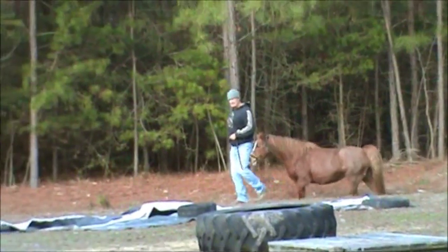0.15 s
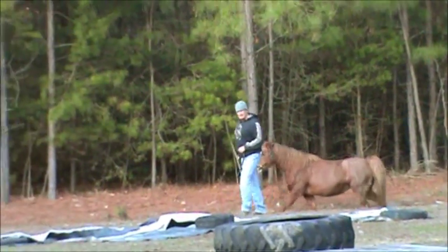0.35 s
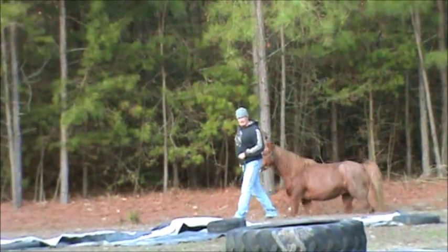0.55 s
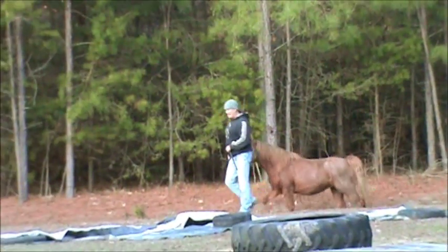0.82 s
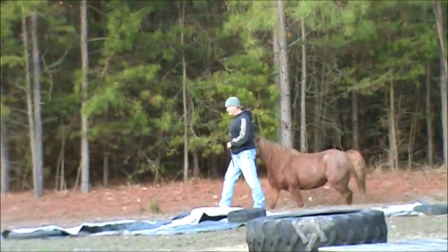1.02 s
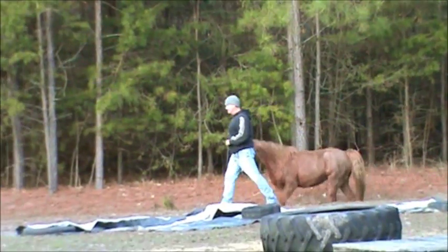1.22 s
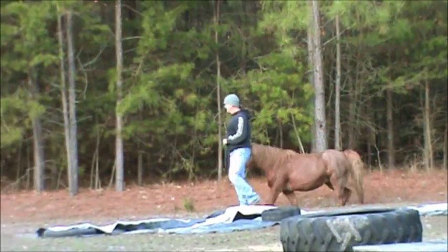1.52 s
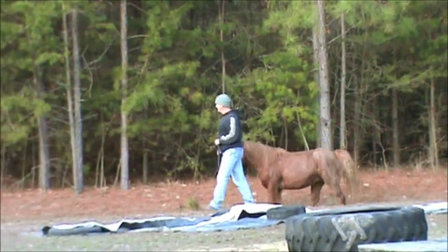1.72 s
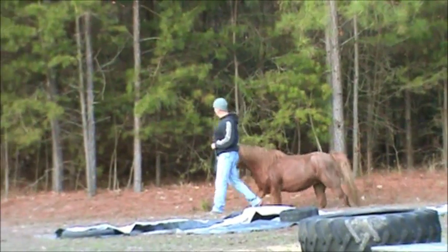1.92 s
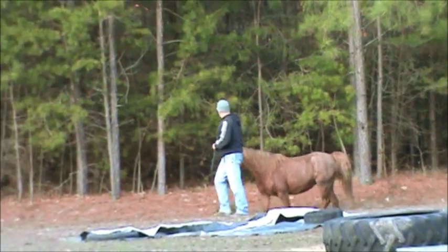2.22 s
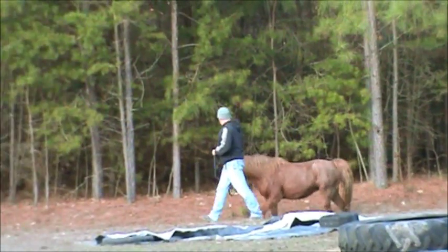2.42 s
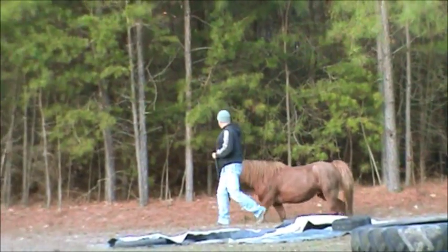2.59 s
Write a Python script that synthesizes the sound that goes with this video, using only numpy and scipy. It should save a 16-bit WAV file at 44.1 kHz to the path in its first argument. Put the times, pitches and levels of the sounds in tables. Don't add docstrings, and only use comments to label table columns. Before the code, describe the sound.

One loud horse whinny slightly left of a stereo microphone in an open yard by woods: shrill fluttering squeal, breathy falling tail with pulsing grunts, short snort, then a tiny bird chip over quiet distant rumble and hiss.

```python
import sys
import numpy as np
from scipy import signal
from scipy.fft import rfft, irfft
from scipy.io import wavfile
from scipy.ndimage import uniform_filter1d

SR = 44100
rng = np.random.default_rng(int(sys.argv[2]) if len(sys.argv) > 2 else 0)


def volts_from_decibels(level):
    exponent = np.asarray(level, float) / 20
    return 10 ** exponent


def int16_out(signal):
    q = np.round(np.clip(np.atleast_2d(signal).T, -1, 1) * 32767)
    wavfile.write(sys.argv[1], SR, q.astype(np.int16))


N = 121275
T = np.arange(N) / SR


def evened(x):
    return x / np.sqrt(np.mean(x ** 2) + 1e-20)


def read(points, hz):
    f, value = np.transpose(points)
    return np.interp(np.log(hz + 1), np.log(f + 1), value)


def curves(table):
    rows = np.transpose(table)
    return [np.interp(T, rows[0], column) for column in rows[1:]]


def bump(s, half):
    return np.exp(-.5 * ((T - s) / half) ** 2)


def drift(s):
    hz = np.fft.rfftfreq(N, 1 / SR)
    return evened(irfft(rfft(rng.standard_normal(N)) * np.exp(-(hz * s * np.pi) ** 2), N))


def resonate(x, hz, width):
    r = np.exp(-np.pi * width / SR)
    turn = np.exp(2j * np.pi * np.cumsum(hz * np.ones(N)) / SR)
    smooth = signal.lfilter([(1 - r) ** 2], [1, -2 * r, r * r], x * turn.conj())
    return 2 * (turn * smooth).real


def noise_band(hz, width):
    return evened(resonate(rng.standard_normal(N), hz, width))


def panned(x, pan_db):
    return np.array([x * volts_from_decibels(pan_db / 2), x * volts_from_decibels(-pan_db / 2)])


# (f/Hz, level/dB per Hz)
AIR_SPECTRUM = [(20, -16), (93, -7), (160, -13.5), (250, -19), (1020, -25.5), (1510, -30.5), (1890, -24.5),
                (6460, -40.5), (15800, -43)]
# (f/Hz, likeness 0-1)
AIR_LIKENESS = [(60, .9999), (150, .995), (300, .85), (700, .93), (1500, .5), (4000, .55), (9000, .65),
                (15000, .86)]


def air():
    frames, hz = N // 256 + 5, np.fft.rfftfreq(1024, 1 / SR)
    a, b, c, d, patches = rng.standard_normal((frames, 513, 5)).T
    patches = uniform_filter1d(patches, size=8, axis=0)
    patches = evened(uniform_filter1d(patches, size=14, axis=1))
    same = np.clip(read(AIR_LIKENESS, hz), -1, 1)[:, None]
    left = a + 1j * b
    right = same * left + np.sqrt(1 - same ** 2) * (c + 1j * d)
    patch_db = (-0.8 + 1.5 * (hz < 200)[:, None]) * patches
    z = np.array([left, right]) * volts_from_decibels(read(AIR_SPECTRUM, hz)[:, None] + patch_db)
    return volts_from_decibels(-44.5) * evened(signal.istft(z, nperseg=1024, noverlap=768)[1][:, :N])


# (f/Hz, width/Hz, level/dB)
FAR_ENGINE = (67.9, 6.8, -57.5)


def drone():
    hz, width, db = FAR_ENGINE
    return volts_from_decibels(db) * noise_band(hz, width)


# (t/s, f/Hz, level/dB, wander/Hz, upper sideband level/dB)
SQUEAL_PATH = [(.05, 1873, -50, 3.9, -12), (.12, 1873, -44, 7, 18.5), (.2, 1925, -29, 4.7, 14.5),
               (.3, 1883, -20, 5.4, 9), (.45, 1896, -23, 10.147, 2), (.75, 1896, -21, 12.73, 0.5),
               (.88, 1916, -20, 23.2, 5), (1.0, 1886, -19.5, 10.8, -7), (1.3, 1857, -21.5, 84.8, -7),
               (1.55, 1790, -27, 201.4, -7.5), (1.8, 1707, -28, 295, 0), (1.97, 1565, -28.5, 341.2, -8),
               (2.08, 1450, -31, 326, -5.5), (2.2, 1267, -29, 187.3, -5), (2.31, 1297, -31, 230, -8),
               (2.41, 1376, -28, 280, 2), (2.5, 1345, -37, 280, -10), (2.7, 1330, -40, 230, -5)]
# (t/s, dip level/dB, half length/s)
TRILL_DIPS = [(0.211, -14.5, 0.015), (0.28, -11, 0.016), (0.298, -5, .003), (0.352, -7.5, 0.011),
              (0.368, -10, .003), (0.401, -14, 0.001647), (0.438, -24.5, 0.0053), (0.475, -28, 0.0029),
              (.511, -18, 0.0054), (0.545, -27, 0.0089), (0.571, -12, .0025), (0.611, -13.5, 0.0042),
              (0.634, -6, 0.0085), (0.652, -15, 0.0032), (0.706, -24, 0.0035), (.718, -17, 0.0025),
              (0.734, -26, 0.0052), (0.756, -23, 0.0014), (0.773, -20, 0.0012), (.793, -30, 0.0045),
              (.832, -16.5, 0.002), (.847, -6, 0.002048), (.882, -14, 0.0016), (0.903, -8.5, 0.0033),
              (.916, -13, 0.0034), (0.93, -10.5, 0.011), (0.947, -20, .004), (.961, -19, .002),
              (0.988, -8, 0.0019), (1.002, -10, 0.00095), (1.021, -2, 0.0032), (1.05, -10, 0.0017),
              (1.07, -14, .006), (1.09, -19, 0.0026), (1.134, -19, 0.006618), (1.165, 1, 0.0038),
              (1.206, 1, 0.005), (1.214, -7, 0.019), (1.247, -31, 0.004), (1.282, -22, 0.0031),
              (1.317, -9, 0.004), (1.338, -9, 0.0038), (1.376, -9, 0.005), (1.41, 1, 0.0021),
              (1.429, -8, 0.0018), (1.45, -12, 0.00433)]
# (f/Hz, width/Hz, level/dB)
MOUTH_RESONANCES = [(1222, 100, -1), (1385, 150, -5), (1680, 240, -4), (1900, 80, 0), (2050, 220, -7),
                    (2230, 150, -7)]
OVERTONE_LEVELS = [-42, -42, -41]


def squeal():
    hz, db, wander_hz, side_db = curves(SQUEAL_PATH)
    wander = np.tanh(drift(.003) + 0.406 * drift(0.01106))
    phase = 2 * np.pi * np.cumsum(hz + wander_hz * wander) / SR
    slow = 2 * np.pi * np.cumsum(108 + 9.27 * drift(0.0172)) / SR
    chop = volts_from_decibels(sum(dip_db * bump(s, half) for s, dip_db, half in TRILL_DIPS))
    sounding = (T > SQUEAL_PATH[0][0]) * (T < SQUEAL_PATH[-1][0])
    level = volts_from_decibels(db + .8 * drift(.004)) * sounding
    sideband = volts_from_decibels(side_db + 1.8 * drift(0.0024)) * np.sin(phase + slow)
    tone = level * (np.sin(phase) + sideband)
    overtones = sum(volts_from_decibels(o_db) * np.sin(k * (phase + slow)) for k, o_db in enumerate(OVERTONE_LEVELS, 2))
    mouth = sum(volts_from_decibels(m_db) * resonate(tone, f, w) for f, w, m_db in MOUTH_RESONANCES)
    return chop * (level * bump(0.2, .045) * overtones + volts_from_decibels(3.5) * mouth)


# (f/Hz, time to fall 60 dB/s)
WOODS_DECAY = [(300, 1), (1200, 0.72), (2000, 1.0), (4000, 0.84), (8000, 0.4672)]


def woods(x, alike):
    taps = np.zeros((2, SR))
    at = np.arange(400, SR - 20, 20)
    at = at + rng.integers(0, 20, (2, len(at)))
    np.put_along_axis(taps, at, rng.choice([-1., 1.], at.shape), 1)
    taps = np.array([taps[0], alike * taps[0] + np.sqrt(1 - alike ** 2) * taps[1]])
    hz, t, z = signal.stft(taps, SR, nperseg=256)
    decay = volts_from_decibels(-60 * t / read(WOODS_DECAY, hz)[:, None])
    tail = signal.istft(z * decay, SR, nperseg=256)[1]
    return signal.fftconvolve(x, tail / np.linalg.norm(tail[0]), axes=1)[:, :N]


# (t/s, level/dB, brightness/dB per octave)
BREATH_EFFORT = [
    (.1, -55, 3),
    (.25, -38, 0),
    (.45, -34, 0),
    (1.1, -29, 0),
    (1.7, -33, 0.5),
    (2.25, -33, -2),
    (2.33, -37, -4.5),
    (2.41, -34, -1),
    (2.53, -41.5, -4.5),
    (2.76, -47.5, -7),
]
# (f/Hz, width/Hz, level/dB, gain over the call/dB per s)
THROAT_RESONANCES = [(707, 209, -3, 0.36), (1262, 287, -0.5, 1.6), (1646, 310, -4, 1.2),
                     (1980, 304, 2.5, -2.5), (2203, 280, -2.5, -1.7), (2634, 197.55, -12.5, -3),
                     (2910, 314, -14.5, 3.85), (3330, 364, -10, 1.5), (3740, 400, -14.5, 0.9),
                     (4407, 704, -14.5, 0.45), (5320, 840, -21.5, -0.2), (6230, 2150, -28, -0.59),
                     (8600, 4400, -37, -1.66)]
# (t/s, treble lift level/dB, half length/s)
BREATH_THROBS = [(0.641, -1, 0.07), (0.753, 2, 0.034), (0.89, 2, 0.025), (1.04, 0.5, 0.022),
                 (1.166, 3, 0.01), (1.293, 2, 0.015), (1.43, 3, 0.027), (1.544, 4, 0.024),
                 (1.696, 5, 0.029), (1.838, 4.5, 0.047), (1.961, 4, 0.03384), (2.098, 6.5, 0.034),
                 (2.264, 9.5, 0.02), (2.399, 6, 0.026)]
# (t/s, factor on f)
JAW_OPENING = [
    (.3, 1.0458),
    (1.0, 1.035),
    (1.4, 1.02),
    (1.75, 1.004),
]


def breath():
    db, tilt_db = curves(BREATH_EFFORT)
    lift_db = sum(throb_db * bump(s, half) for s, throb_db, half in BREATH_THROBS)
    turbulence = rng.standard_normal(N) * volts_from_decibels(0.27 * drift(0.0021))
    jaw, = curves(JAW_OPENING)
    out = np.zeros(N)
    for k, (hz, width, f_db, slope_db) in enumerate(THROAT_RESONANCES):
        share = np.clip((hz - 1500) / 2000, .15, 1.3)
        patch_db = 2.53 * drift(0.015)
        level_db = f_db + slope_db * (T - 0.43) + share * lift_db + patch_db + tilt_db * np.log2(hz / 2000)
        moved = hz if 1000 < hz < 3100 else hz * jaw
        band = evened(resonate(turbulence, moved, width)) * np.sqrt(width)
        out += (-1) ** k * band * volts_from_decibels(level_db)
    return evened(out) * volts_from_decibels(db) * (T > BREATH_EFFORT[0][0]) * (T < BREATH_EFFORT[-1][0])


# (f/Hz, width/Hz, share removed 0-1)
NASAL_BRANCHES = [(901, 145.22, 0.74), (1383, 155.2, 0.56), (2385, 106.66, 0.24)]


def swallowed(x):
    hz = np.fft.rfftfreq(N, 1 / SR)
    valleys = [1 - share * np.exp(-.5 * ((hz - f) / w) ** 2) for f, w, share in NASAL_BRANCHES]
    return irfft(rfft(x) * np.prod(valleys, axis=0), N)


# (f/Hz, width/Hz, level/dB, half length/s)
PALATE_WHISTLES = [(4650, 300, -51, .14), (2700, 190, -49, .17), (3480, 280, -43, .1),
                   (3330, 160, -40, .03), (3320, 150, -39, .035), (3310, 150, -40, .025),
                   (3430, 150, -41, .014), (8300, 1500, -60, .025), (9000, 2500, -62, .025),
                   (4450, 400, -45, .06), (6900, 400, -57, .3)]
WHISTLE_TIMES = (.42, .45, 1.12, 1.71, 1.83, 1.96, 2.265, .64, 2.33, 1.44, 1.0)


def whistles():
    rows = zip(PALATE_WHISTLES, WHISTLE_TIMES)
    return sum(volts_from_decibels(db) * bump(s, half) * noise_band(hz, w) for (hz, w, db, half), s in rows)


# (t/s, level/dB, pulse f/Hz, half length/s)
GRUNT_PULSES = [(0.385, -53.5, 170, 0.0222), (0.877, -49.5, 169.7, 0.022), (1.15, -44, 171.2, 0.0107),
                (1.299, -49, 172.7, 0.016), (1.443, -44, 169.4, 0.027), (1.599, -42, 171.9, 0.03139),
                (1.756, -45.5, 164.3, 0.041), (1.875, -42.5, 162.5, 0.021), (2.032, -45.5, 147.6, 0.034424),
                (2.172, -42.5, 148.3, 0.031), (2.335, -44, 130, 0.022), (2.468, -47, 130, 0.027)]
# (f/Hz, width/Hz, level/dB)
CHEST_RESONANCES = [(130, 54, -13.5), (207, 96, 1), (345, 600, -2.5), (527.5, 61, 3.5)]


def grunts():
    times, _, pitch, _ = np.transpose(GRUNT_PULSES)
    turns = np.cumsum(np.interp(T, times, pitch) * (1 + 0.0598 * drift(0.00326))) / SR
    folds = sum(np.cos(2 * np.pi * k * turns) for k in range(1, 6))
    drive = .7 * evened(folds) + .3 * noise_band(260, 440)
    rings = [volts_from_decibels(db) * resonate(drive, hz, w) for hz, w, db in CHEST_RESONANCES]
    chest = evened(sum((-1) ** k * ring for k, ring in enumerate(rings)))
    thud = np.cos(2 * np.pi * turns)
    out = np.zeros(N)
    for s, db, hz, half in GRUNT_PULSES:
        thud_db = 0.56 * (142.5 - hz) - 5.5
        out += volts_from_decibels(db) * bump(s, half) * (chest + volts_from_decibels(thud_db) * thud)
    return out


# (t/s, half length/s, f/Hz, width/Hz, level/dB)
CHEST_HUM = (2.2, -0.07, 203, 45, -48)


def nicker():
    s, half, hz, width, db = CHEST_HUM
    return volts_from_decibels(db) * bump(s, half) * noise_band(hz, width)


# (f/Hz, width/Hz, level/dB, half length/s)
NOSTRIL_RESONANCES = [(4220, 860, -33.5, 0.019), (4387, 260, -46.5, 0.035), (6350, 1600, -49, 0.026),
                      (7030, 400, -53, 0.069), (9000, 2900, -52.5, 0.05), (12000, 3800, -59.5, .03)]
NOSTRIL_TIMES = (2.402, 2.465, 2.39, 2.46, 2.455, 2.46)


def snort():
    puff = rng.standard_normal(N) * volts_from_decibels(2.1 * drift(0.00079))
    rows = zip(NOSTRIL_RESONANCES, NOSTRIL_TIMES)
    nose = sum(volts_from_decibels(db) * bump(s, half) * evened(resonate(puff, hz, w)) for (hz, w, db, half), s in rows)
    return np.clip((2.51 - T) / 0.024, 0, 1) * nose


# (t/s, f/Hz, level/dB, half length/s, glide/Hz per s)
BIRD_NOTES = [
    (2.729, 4050, -41, 0.0026, -90000),
    (2.73, 3455, -38, 0.0039, -10000),
    (2.74, 6260, -56, 0.0045, -5000),
]


def bird():
    out = np.zeros(N)
    for s, hz, db, half, glide in BIRD_NOTES:
        t = T - s
        out += volts_from_decibels(db) * bump(s, half) * np.sin(2 * np.pi * (hz + glide * t / 2) * t)
    return out


def scene():
    high, low = squeal(), swallowed(breath())
    close = grunts() + snort() + whistles() + nicker()
    head_pan_db = 6 - 0.5 * np.minimum(T, 1.4)
    pony = panned(high, head_pan_db) + panned(low + close, .5)
    squeal_echo = volts_from_decibels(-11) * woods(panned(high, 1.5), 0.15)
    breath_echo = volts_from_decibels(-2.5) * woods(panned(low + volts_from_decibels(-11.0) * close, 0), 0.58)
    return pony + squeal_echo + breath_echo + bird() + air() + drone()


def roll_off(x):
    return signal.sosfilt(signal.butter(12, 15920, fs=SR, output="sos"), x)


def record(dry):
    whine = volts_from_decibels(-77.5) * np.sqrt(2) * np.sin(2 * np.pi * 15734 * T)
    band_limit = signal.firwin(2047, 15930, window=("kaiser", 9), fs=SR)
    mix = signal.oaconvolve(dry + whine, band_limit[None], "same")
    return roll_off(mix)


dry = scene()
out = record(dry)
int16_out(out)
```